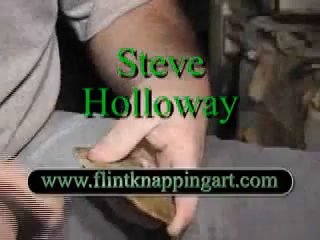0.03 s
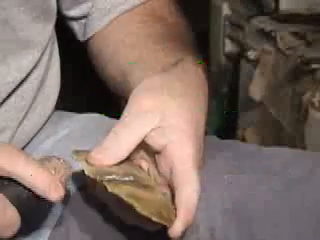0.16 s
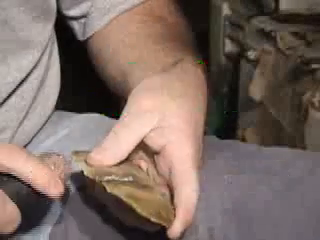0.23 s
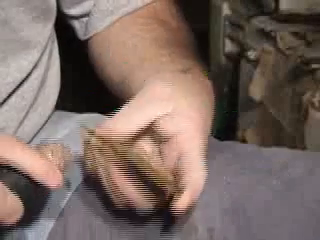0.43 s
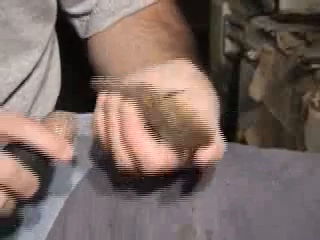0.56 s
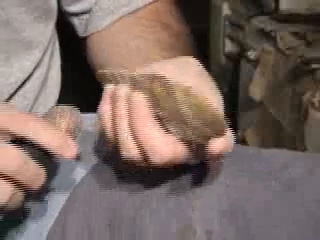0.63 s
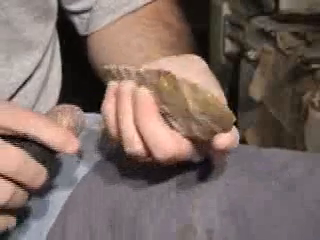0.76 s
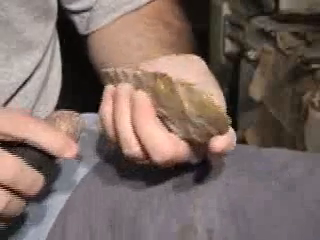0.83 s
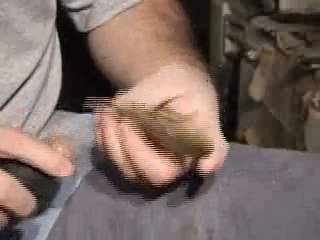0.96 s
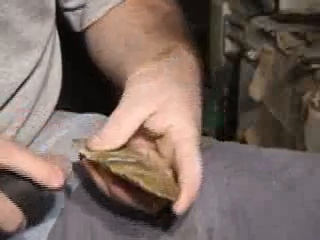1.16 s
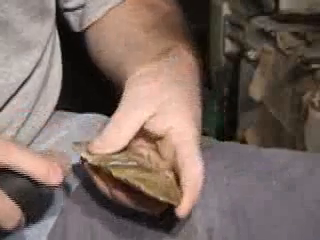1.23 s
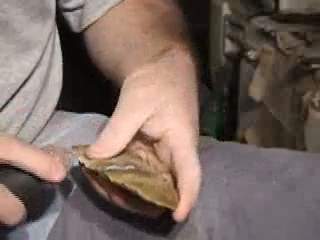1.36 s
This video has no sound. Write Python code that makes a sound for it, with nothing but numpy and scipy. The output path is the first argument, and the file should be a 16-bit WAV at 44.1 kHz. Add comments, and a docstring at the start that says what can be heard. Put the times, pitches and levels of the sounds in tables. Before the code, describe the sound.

A sharp strike chips a stone, and the shards scatter with a glassy clinking.

```python
"""A few stone chips settle over the low noise of a quiet workshop. Then a knapper strikes a hand-held flint,
close by: the edge cracks off and shatters, each brief contact exciting a broad band of frequencies.
Thin flakes land among earlier waste, ring like glass in their normal modes and bounce in a spray of grit.
One late flake clinks half a second after the blow."""
import sys
import numpy as np
from scipy import signal
from scipy.fft import rfft, irfft
from scipy.io import wavfile

SR = 44100
rng = np.random.default_rng(int(sys.argv[2]) if len(sys.argv) > 2 else 0)


def bounce(signal):
    """Save signal as a 16-bit WAV file at the path given by the first command-line argument."""
    frames = np.transpose(np.atleast_2d(signal))
    limited = np.clip(frames, -1, 1)
    pcm = np.round(limited * 32767).astype(np.int16)
    wavfile.write(sys.argv[1], SR, pcm)


N = 61739


def amp(db):
    """The decibel scale: 20 dB is a factor of ten in amplitude."""
    return 10 ** (np.asarray(db) / 20)


def unit(x):
    """Normalisation to an rms of 1."""
    return x / np.sqrt(np.mean(x ** 2) + 1e-20)


def add(mix, start_s, sound):
    """Superposition: a sound adds to the mix from its onset on."""
    part = mix[..., max(round(start_s * SR), 0):][..., :sound.shape[-1]]
    part += sound[..., :part.shape[-1]]


def colour(x, points):
    """Zero-phase filtering by a curve (f/Hz, gain/dB), interpolated in log frequency."""
    hz, db = np.transpose(points)
    gain_db = np.interp(np.log(np.fft.rfftfreq(N, 1 / SR) + 1), np.log(hz + 1), db)
    return irfft(rfft(x) * amp(gain_db), N)


def lowpass(x, hz):
    """Second-order low-pass: 12 dB per octave above the cutoff."""
    return signal.sosfilt(signal.butter(2, hz, fs=SR, output="sos"), x)


def background():
    """Stationary room noise, partly coherent between the ears, with a faint pure-tone hum."""
    # spectral density of the room noise: f/Hz, relative level/dB
    spectrum = [(15, -35), (30, -15.5), (55, -6), (105, -0.5), (150, -4.5), (300, -2.5), (500, -4.5),
                (800, -2), (1300, -10), (1650, -19), (2000, -22), (2500, -10), (2850, -21.5), (3600, -21.5),
                (4500, -18.5), (6200, -20.5), (6900, -29), (9000, -28), (11300, -37), (12000, -53.5)]
    # stereo width of the room noise: f/Hz, side over mid/dB
    width = [(60, -7), (280, -14.5), (700, -9.5), (1300, -10), (2600, -5.5), (4500, -21), (12000, -18.5)]
    noise_db, lean_db, hum_db, hum_hz = -46, 0.45, -61.5, 109
    mid, side = [colour(x, spectrum) for x in rng.standard_normal((2, N))]
    side = colour(side, width)
    air = np.array([mid + side, mid - side]) * amp([[lean_db], [-lean_db]])
    hum = np.sin(2 * np.pi * hum_hz * np.arange(N) / SR)
    return amp(noise_db) * unit(air) + amp(hum_db) * unit(hum)


def reverberation(x):
    """Diffuse reflections decay exponentially; the first ones are wide in the midrange."""
    # stereo width of the reflections: f/Hz, side over mid/dB
    width = [(150, 2), (500, -2), (1100, 6.5), (2000, 4), (3500, -5.5), (6000, -24), (12000, -11.5)]
    room_db, mid_t60_s, side_t60_s = -14, .2, .05
    t = np.arange(SR // 2) / SR
    decay = amp(-60 * t / np.array([[mid_t60_s], [side_t60_s]]))
    tails = rng.standard_normal((2, len(t))) * decay * (t > .002)
    tails /= np.linalg.norm(tails, axis=1, keepdims=True)
    mid, side = signal.fftconvolve(x[None], tails, axes=1)[:, :N]
    side = colour(side, width)
    return amp(room_db) * np.array([mid + side, mid - side])


def tinkle(count=40, low_hz=6200, high_hz=11500, t60_s=.025, landings_per_s=420):
    """Tiny chips land at random, each a damped oscillator with one natural frequency."""
    t, out = np.arange(SR // 16) / SR, np.zeros(N)
    for hz in np.geomspace(low_hz, high_hz, count) * rng.uniform(.98, 1.02, count):
        landings = rng.uniform(.5, 1, N) * (rng.random(N) < landings_per_s / count / SR)
        ring = amp(-60 * t / t60_s) * np.sin(2 * np.pi * hz * t)
        out += signal.oaconvolve(landings, ring)[:N]
    return unit(out)


def grit(grains_per_s=7000, chips_over_dust_db=-7):
    """Shot noise: independent ticks of stone dust merge into a spray, with chips tinkling in it."""
    # envelope of the spray: t/s, level/dB
    envelope = [(0, -39), (.06, -73), (.13, -56), (.19, -51.5), (.238, -61), (0.242, -19), (.262, -17.5),
                (.272, -25), (.33, -23.5), (.36, -30), (.41, -27), (0.422, -20.5), (.45, -33.5),
                (.52, -34.5), (.58, -44.5), (.64, -53), (0.738, -59.5), (0.744, -25), (.77, -33.5),
                (.81, -48.5), (.85, -64.5), (1.4, -89)]
    # spectrum of the dust: f/Hz, relative level/dB
    spectrum = [(300, -33), (1200, -20), (2000, -8.5), (2900, -4.5), (3700, -8.5), (5000, -3), (7000, 0.5),
                (9000, -0.5), (11500, -8)]
    ticks = rng.choice([-1, 1], N) * (rng.random(N) < grains_per_s / SR)
    dust = unit(colour(ticks, spectrum))
    spray = unit(dust + amp(chips_over_dust_db) * tinkle())
    return spray * amp(np.interp(np.arange(N) / SR, *np.transpose(envelope)))


def flakes():
    """Free vibration: each piece rings in its normal modes until the next touch damps it."""
    # modes of each loose piece: f/Hz, relative level/dB, T60/s
    modes = {"blade": [(8447, 0, 1.0), (8652, -24, .3), (11320, -26, .3)], "plate": [(5563, 0, 1.2),
             (5616, -16, .25), (5726, -19, .15)], "scale": [(6724, 0, .3), (7280, -15, .2)],
             "sliver": [(9425, 0, .3), (9120, -9, .1), (10405, -13, .25)], "shard": [(7963, 0, .18)],
             "splinter": [(9002, 0, .07)], "wafer": [(5902, 0, .19)], "late flake": [(7680, 0, .06),
             (7722, -13, .12), (11250, -22, .2)], "late chip": [(7664, 0, .36), (11262, -5, .26)],
             "old flake": [(5023, 0, .42), (8759, -7, .35), (9388, -5, .32), (11150, -13, .3)],
             "crumb": [(9610, 0, .07)], "speck": [(11250, 0, .04)]}
    # landings and bounces: t/s, piece, level/dB, free ringing time/s
    landings = [(0, "old flake", -37, .23), (.0705, "crumb", -33.5, 0.038), (.211, "crumb", -47.5, 0.03),
                (.243, "blade", -19, .026), (.251, "splinter", -15, .01), (.2698, "blade", -11, 0.0862),
                (.3728, "blade", -14, 0.0065), (.268, "plate", -23, .077), (.345, "plate", -14, 0.016),
                (.3565, "plate", -19.5, 0.0053), (0.367, "plate", -19, 0.011),
                (0.392, "plate", -27.5, 0.013), (.267, "scale", -27, 0.012), (.282, "scale", -23, 0.033),
                (.313, "scale", -20, 0.029), (.387, "scale", -30.5, 0.015), (.271, "sliver", -21, 0.0072),
                (.304, "sliver", -23.5, 0.032), (.357, "sliver", -18, 0.031),
                (.4205, "shard", -20.5, 0.033), (.4645, "shard", -28.5, 0.011),
                (.4778, "shard", -27, 0.027), (.52, "shard", -36, .06), (.4522, "splinter", -14.5, .045),
                (.5015, "splinter", -20, .05), (.4918, "wafer", -17, 0.029), (0.529, "wafer", -27.5, .022),
                (.570, "wafer", -33, 0.0079), (.591, "wafer", -34, 0.043),
                (.7432, "late flake", -10.5, 0.0058), (.7592, "late flake", -14.5, 0.048),
                (.7935, "late flake", -29.5, 0.016), (.8175, "late flake", -39.5, .2),
                (.748, "late chip", -39, 0.236), (.7555, "speck", -17, .008), (0.769, "speck", -25, .016)]
    rise_s, damping_s = .0003, .0053
    rock_depth, rock_hz, spread_db = 0.12, 130, 0.23
    out, t = np.zeros((2, N)), np.arange(N // 4) / SR
    pan_db = dict(zip(modes, spread_db * rng.uniform(-1, 1, len(modes))))
    for start_s, piece, level_db, free_s in landings:
        attack = 1 - np.exp(-t / rise_s)
        damping = np.exp(-np.maximum(t - free_s, 0) / damping_s)
        ring = 0
        for hz, db, t60 in modes[piece]:
            # a rocking piece flutters in amplitude and phase
            swell, phase = rock_depth * unit(lowpass(rng.standard_normal((2, len(t))), rock_hz))
            ring += amp(db - 60 * t / t60) * (1 + swell) * np.sin(2 * np.pi * hz * t + phase)
        pan = amp([[pan_db[piece]], [-pan_db[piece]]])
        add(out, start_s, np.sqrt(2) * amp(level_db) * attack * damping * ring * pan)
    return out


def contact(level_db, centre_hz, octaves, decay_ms, size=4096):
    """Source and filter: a dying cluster of tiny fractures excites one broad resonance."""
    t, hz = np.arange(size) / SR, abs(np.fft.fftfreq(size, 1 / SR)) + 1
    fade = np.exp(-1000 * t / decay_ms)
    cluster = fade * rng.choice([-1., 1.], size)
    for _ in range(4):  # even out the spectrum while keeping the decay
        whitened = irfft(np.exp(1j * np.angle(rfft(cluster))))
        cluster = fade * np.sign(whitened)
    log_gain = -1.5 * np.log(1 + (np.log2(hz / centre_hz) / octaves) ** 2 / 2)
    resonance = np.exp(np.conj(signal.hilbert(log_gain)))  # minimum phase
    sound = np.fft.ifft(np.fft.fft(cluster) * resonance).real
    return amp(level_db) * sound * np.linalg.norm(fade) / np.linalg.norm(sound)


def impacts():
    """Impact excitation: hard contacts give bright clicks, soft ones dull knocks. The blow is at 0.24 s."""
    # tool, stone and chips meeting: t/s, level/dB, centre f/Hz, width/octaves, decay time/ms
    clicks = [(.009, -33.5, 2500, 1.54, 36), (.0335, -23, 5600, 0.26, 3.1), (.038, -26.5, 2400, 1.2, 4.7),
              (.0698, -30, 6000, 1.8, 1.15), (.097, -33, 4000, 1.2, 5.8), (.103, -32, 5500, 0.26, 7.7),
              (.1212, -29, 3200, 0.77, 7.3), (.1375, -40, 4500, 1.2, 7.5), (.165, -40, 5500, 0.38, 3.7),
              (.2409, 0.5, 3890, .4, 0.56), (.2424, -8.5, 6200, 1.4, 3.7), (.2465, -11.5, 6000, 1.7, 1.3),
              (.2497, -5.5, 5800, 1.1, 1.9), (.2532, -10, 6500, 0.84, 1.1), (.2558, -5, 7000, 2.1, 2.6),
              (.2625, -8, 5000, 0.89, 1.5), (.2638, -5.5, 4600, 0.37, 0.88), (.3565, -9.5, 5800, 0.23, 2.8),
              (.323, -21, 3200, 0.57, 0.91), (.3728, -16.5, 3500, 0.88, 1.2), (.4032, -20, 7100, 0.24, 2),
              (.4166, -3, 5130, 0.97, 0.92), (.4212, -11.5, 6500, 0.5, 1), (.4507, -9, 7000, 0.42, 0.35),
              (.4644, -16.5, 7500, 0.38, 0.97), (.4777, -17, 7500, 0.36, 0.48),
              (.4917, -24, 6500, 0.38, 0.27), (.5195, -18, 7500, .7, 0.49), (.5648, -22, 8000, .55, 0.76),
              (.622, -34, 7500, 0.35, .4), (.6617, -31, 7500, 0.41, 0.44), (.6988, -35, 8000, .5, 0.36),
              (.7432, -10, 7230, 0.41, 0.89), (.7555, -37, 8000, .8, 1.7), (.759, -24, 8000, 0.4, 2.3),
              (.7628, -21, 5000, 1.2, 1.3), (.7843, -25, 4300, 0.12, 0.87),
              (.7932, -20.5, 6000, 0.59, 0.87)]
    # stone against the hand, a piece on cloth: t/s, level/dB, centre f/Hz, width/octaves, decay time/ms
    thuds = [(.241, -30.5, 700, 2.7, 6), (.2565, -24.5, 970, 1.05, 6.1), (.5145, -28.5, 720, 0.54, 4.7),
             (.243, -37.5, 200, 0.4, 14)]
    out = np.zeros(N)
    for start_s, *shape in clicks + thuds:
        add(out, start_s, contact(*shape))
    return out


def scene():
    """Superposition of impacts and grit, their reflections, the ringing flakes and the room noise."""
    direct = impacts() + grit()
    return direct + reverberation(direct) + flakes() + background()


def record(dry):
    """Soft saturation and a band limit; the loudest sounds waver in each ear and carry a low flutter."""
    waver_depth, waver_hz = 0.28, 90
    flutter_gain_db, flutter_hz = -13.5, 36.2
    ceiling, cutoff_hz = 0.89, 11900
    envelope = np.sqrt(abs(lowpass(dry ** 2, waver_hz)))
    waver = unit(lowpass(rng.standard_normal((2, N)), waver_hz))
    wavering = dry * (1 + waver_depth * waver * envelope)
    saturated = ceiling * np.tanh(wavering / ceiling)
    low_noise = unit(lowpass(rng.standard_normal((2, N)), flutter_hz))
    flutter = amp(flutter_gain_db) * low_noise * lowpass(saturated ** 2, flutter_hz)
    band_limit = signal.firwin(255, cutoff_hz, window=("kaiser", 9), fs=SR)
    return signal.oaconvolve(saturated + flutter, band_limit[None], "same")


dry = scene()
out = record(dry)
bounce(out)
```